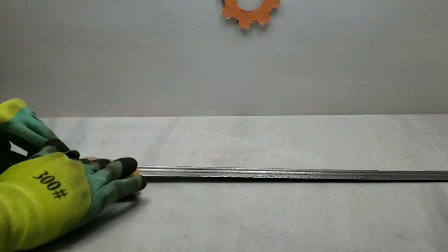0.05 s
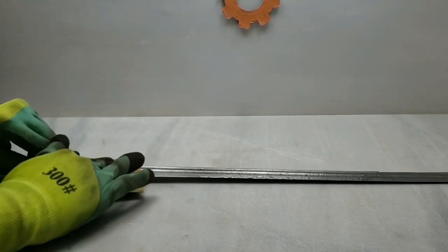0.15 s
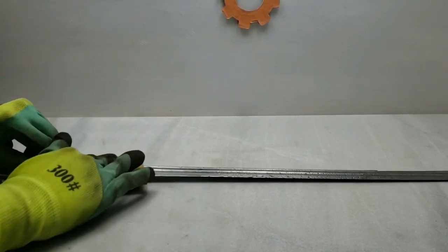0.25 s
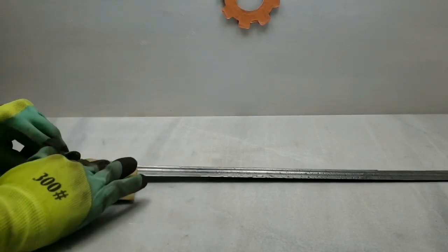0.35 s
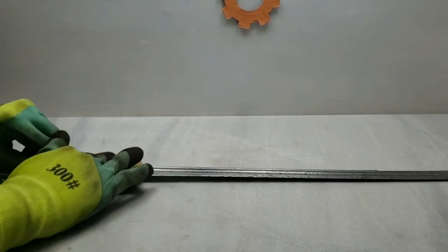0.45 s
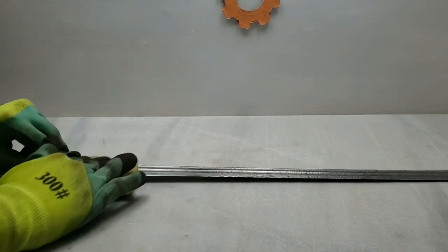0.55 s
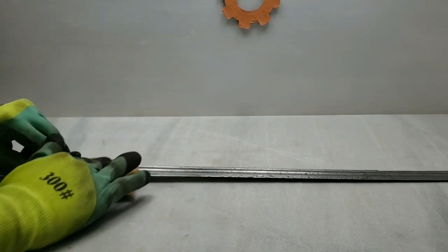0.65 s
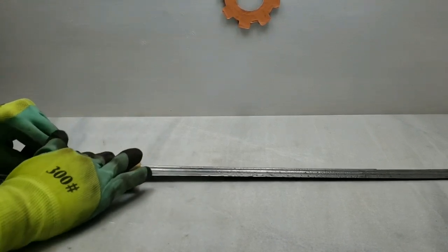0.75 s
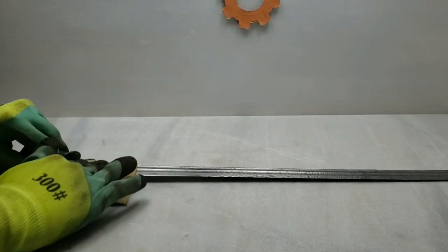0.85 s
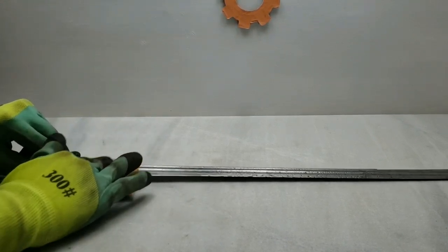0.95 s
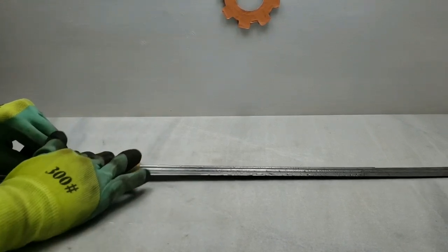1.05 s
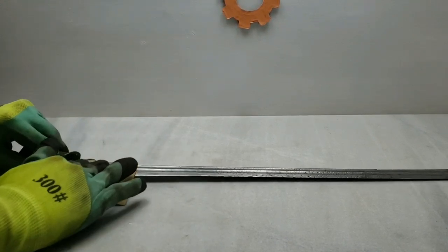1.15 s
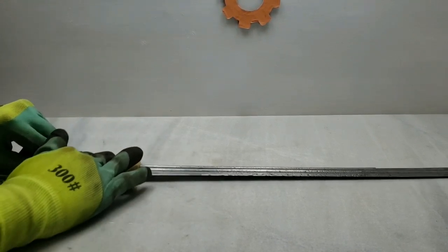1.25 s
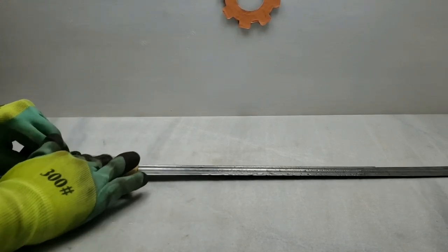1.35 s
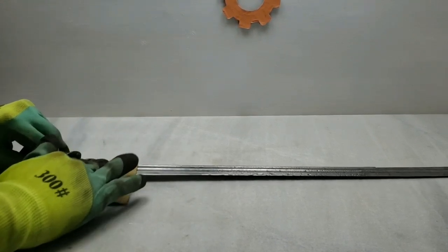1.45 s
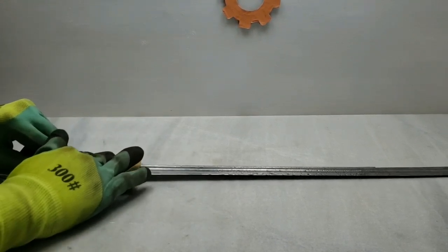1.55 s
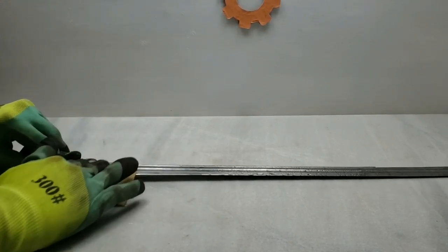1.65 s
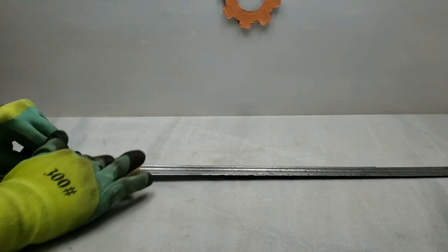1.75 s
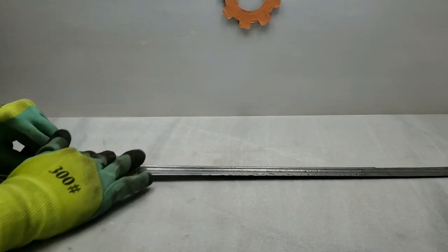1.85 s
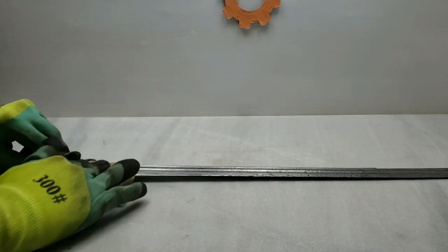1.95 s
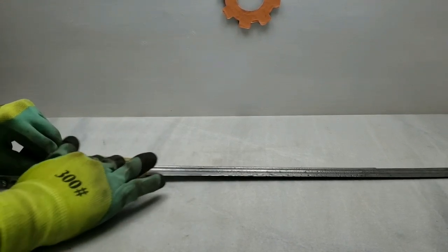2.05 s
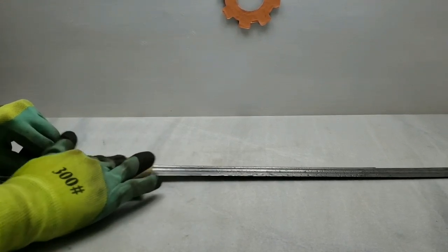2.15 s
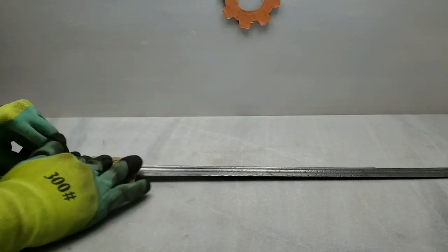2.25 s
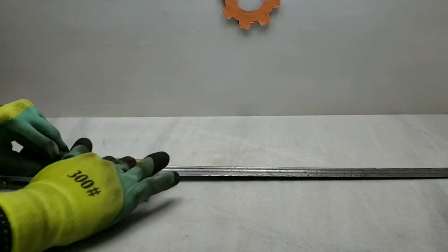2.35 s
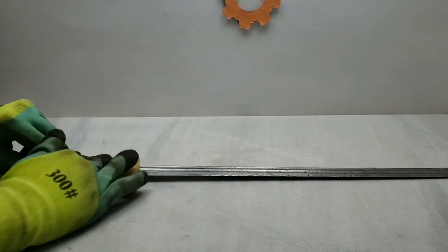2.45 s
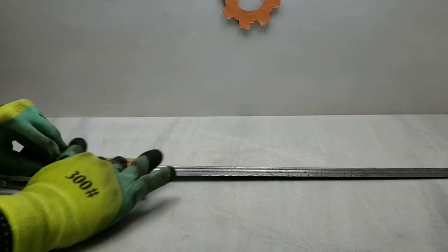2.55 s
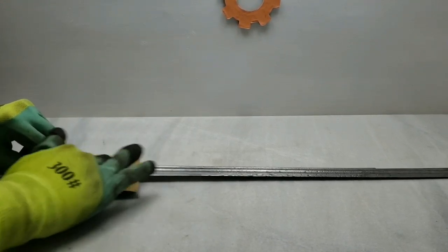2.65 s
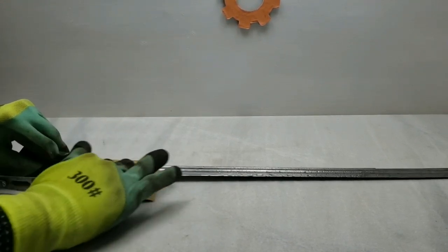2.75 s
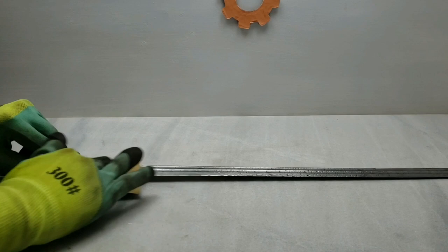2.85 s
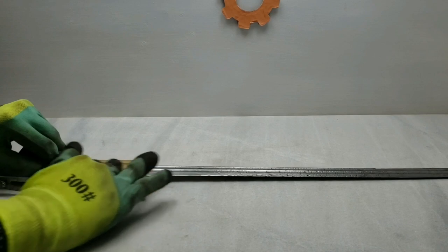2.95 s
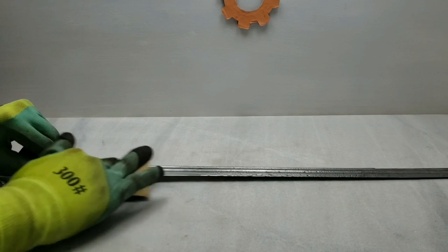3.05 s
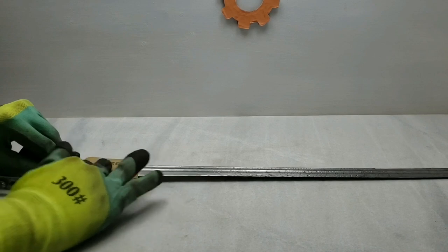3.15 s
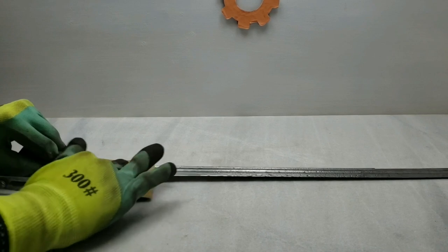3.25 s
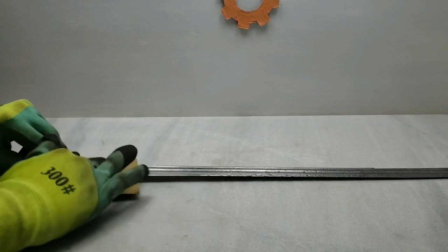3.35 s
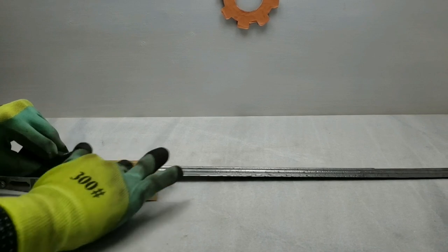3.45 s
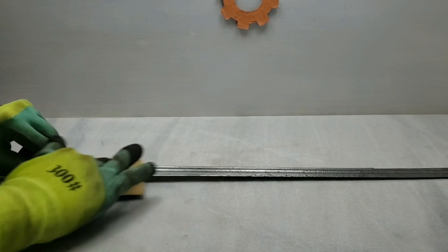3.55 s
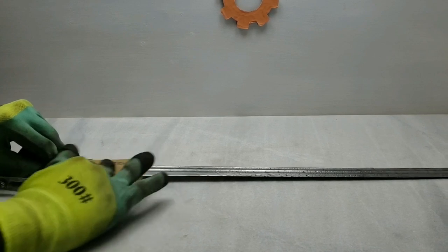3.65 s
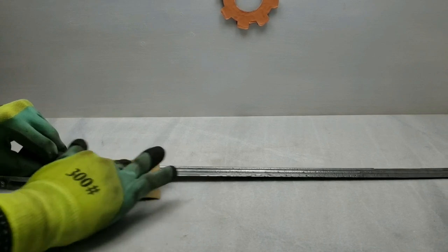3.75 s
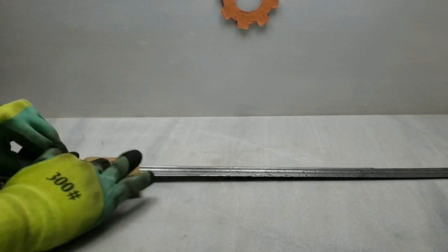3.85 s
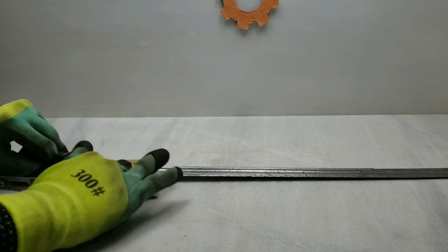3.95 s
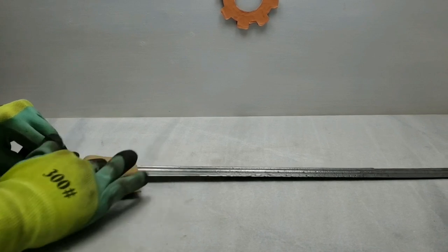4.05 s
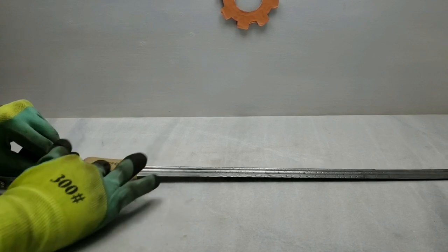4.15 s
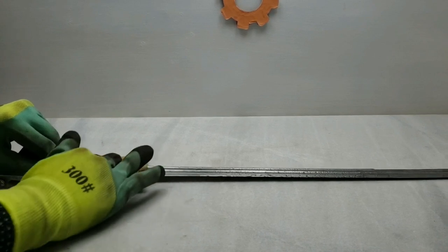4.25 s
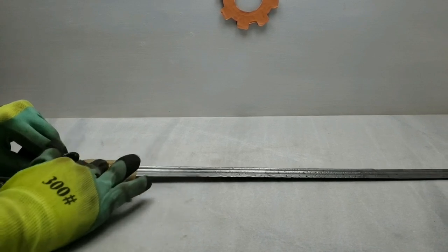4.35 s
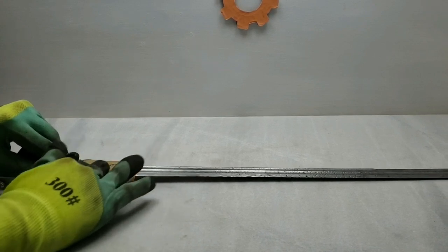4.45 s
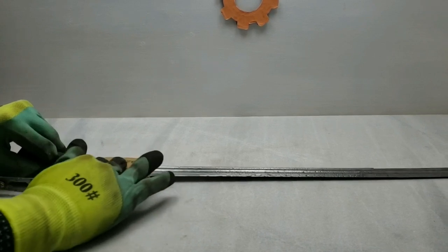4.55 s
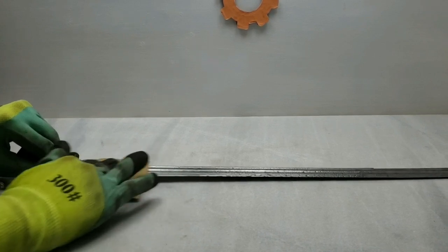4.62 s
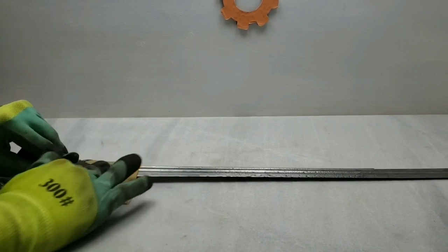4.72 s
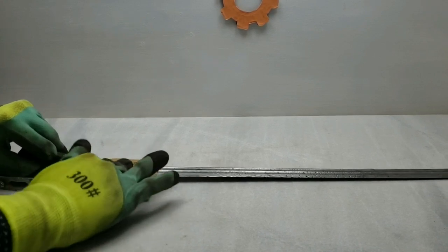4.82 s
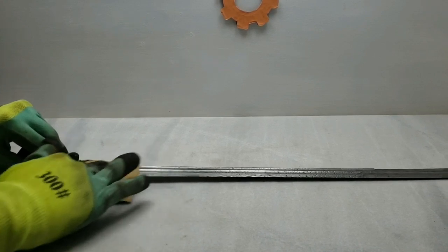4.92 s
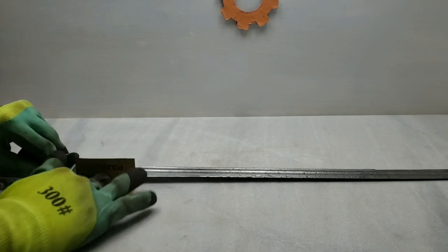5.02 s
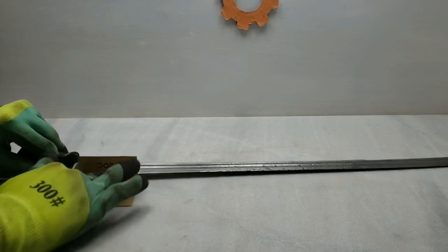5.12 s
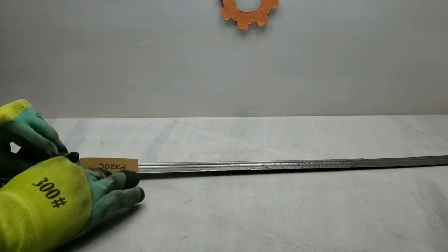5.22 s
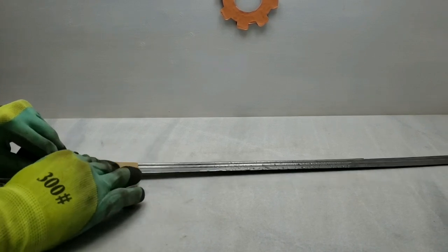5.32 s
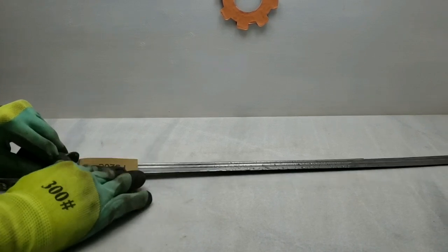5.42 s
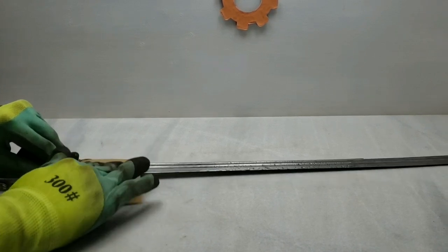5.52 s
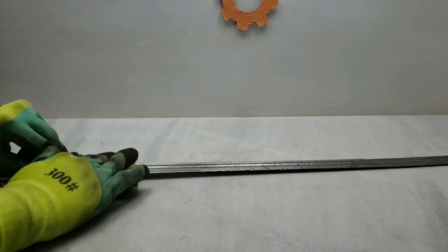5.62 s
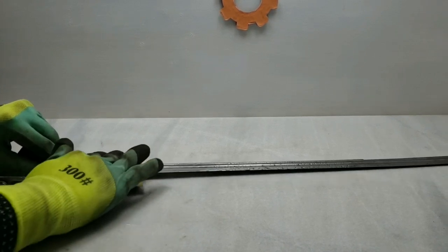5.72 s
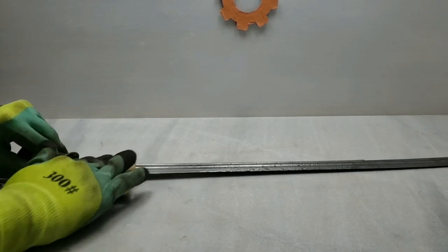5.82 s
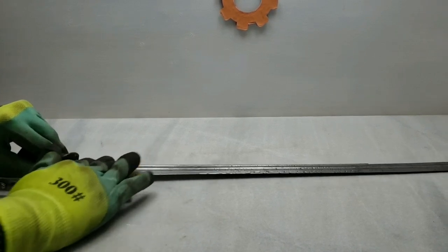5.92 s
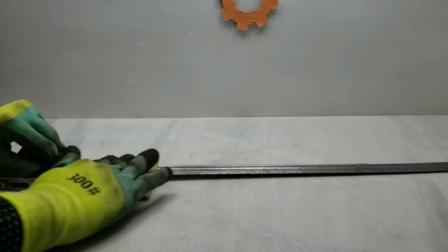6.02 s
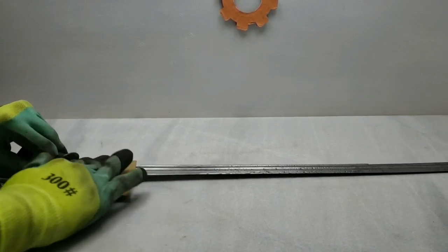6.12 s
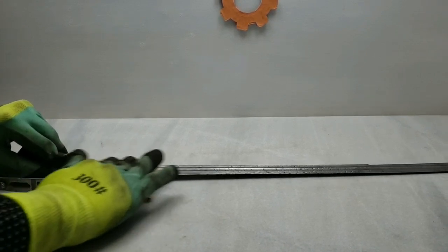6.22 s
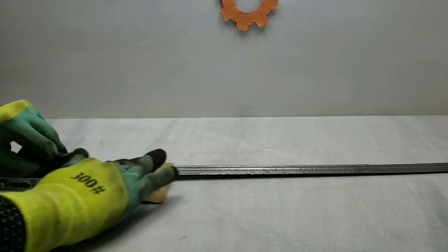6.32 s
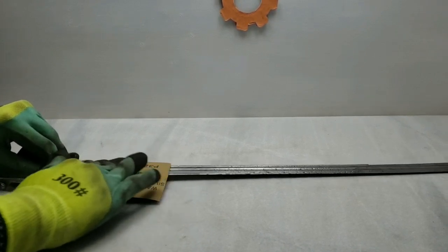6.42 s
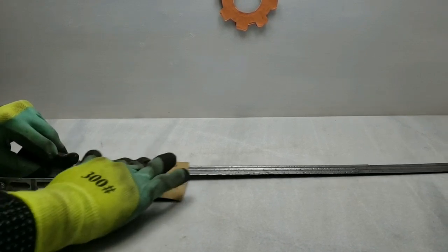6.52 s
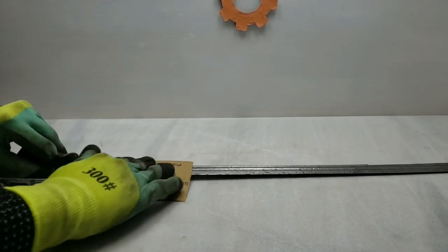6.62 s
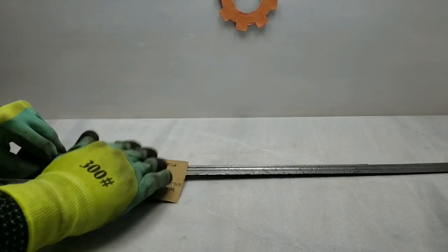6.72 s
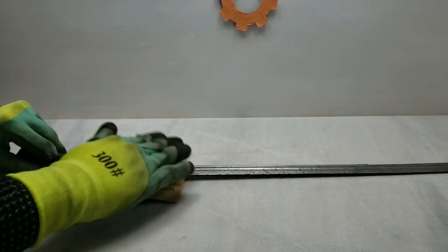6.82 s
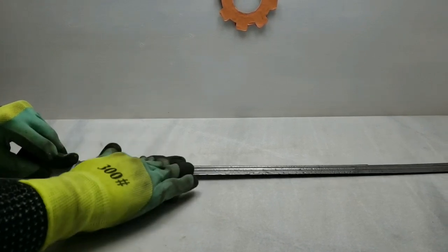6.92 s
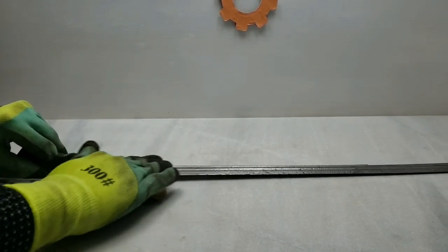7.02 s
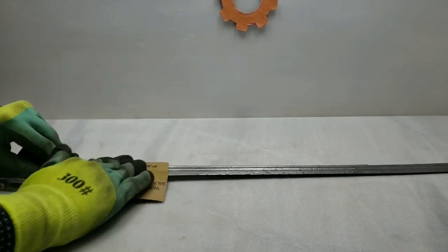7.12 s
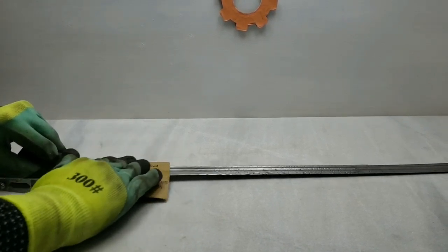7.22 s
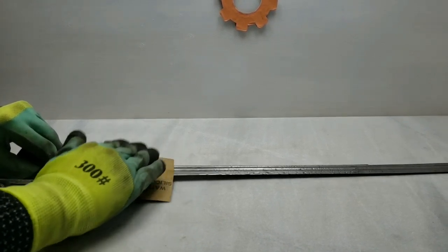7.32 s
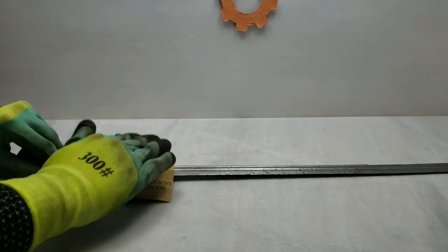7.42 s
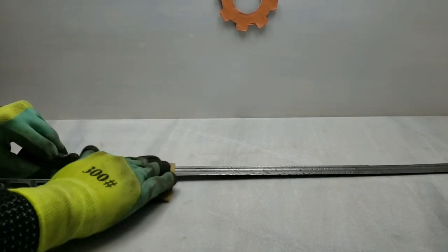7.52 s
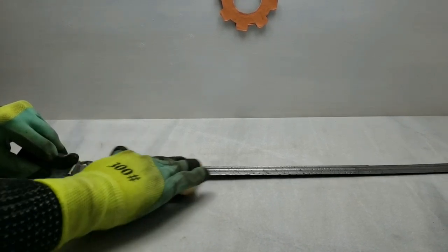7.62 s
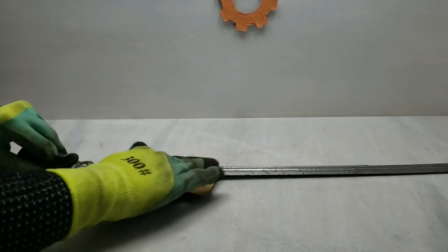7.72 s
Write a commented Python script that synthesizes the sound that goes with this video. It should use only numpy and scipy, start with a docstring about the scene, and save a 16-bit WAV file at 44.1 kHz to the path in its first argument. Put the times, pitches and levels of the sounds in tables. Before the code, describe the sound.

Wet sandpaper rubs quickly back and forth on a steel blade, gritty hissing strokes, with one loud metallic clatter on the bench partway through.

```python
"""Gritty hiss strokes come first: wet sandpaper rubbed to and fro along a steel blade lying on a bench.
Each stroke is grain noise shaped by the paper's speed; its load drums and rasps the bench through the blade.
The blade knocks and skids as ringing modes plus scuffing noise, with one loud clatter near 5 s; the frame sways low.
A small hard room of decaying noise echoes fills the pauses over quiet air, picked up close by a two-port microphone."""
import sys
import numpy as np
from scipy import signal
from scipy.fft import rfft, irfft, next_fast_len
from scipy.io import wavfile
from scipy.ndimage import uniform_filter1d

SR = 44100
rng = np.random.default_rng(int(sys.argv[2]) if len(sys.argv) > 2 else 0)


def transcribe(signal):
    """Save signal, clipped to [-1, 1], as a 16-bit WAV file at the path in sys.argv[1]."""
    frames = np.atleast_2d(signal).T
    limited = np.clip(frames, -1, 1)
    pcm = np.round(limited * 32767).astype(np.int16)
    wavfile.write(sys.argv[1], SR, pcm)


N = 342657  # length in samples

# Quiet room air, relative spectrum: [f/Hz, level/dB]
AIR_COLOUR = [(18, -23.5), (30, 4), (118, -6), (239, -19), (822, -11), (1220, -23), (2170, -11),
              (2680, -27), (5170, -20.5), (8740, -42.5), (14400, -22), (16000, -37)]
AIR_DB = -71.5  # rms fed to the ports

# Decay of the room: [f/Hz, t60/s]
ROOM_DECAY = [(100, 0.41), (500, 0.15), (2000, 0.31), (5000, 0.29), (10000, 0.34), (16000, 0.35)]
# Room against direct sound: [f/Hz, level/dB]
ROOM_LEVEL = [(100, -34.5), (400, -7), (1500, -1), (5000, -6.5), (12000, -10)]

# Phase by which the left port leads: [f/Hz, lead/rad]
PORT_LEAD = [(0, -2), (600, 1.06), (860, -2), (1380, 3), (2070, 1.34), (3450, 2.5), (5250, 5.5),
             (7670, 4.5), (9040, 11.5), (9990, 8.5), (12100, 4.5), (13000, 0.5), (14600, -3.5),
             (16600, -20)]
# Left minus right: [f/Hz, level/dB]
PORT_TILT = [(60, -4), (180, 2), (550, -0.5), (1650, 4.5), (4970, -1.5), (15000, 0)]
# Left-right likeness, as a share of power: [f/Hz, share/0..1]
PORT_LIKENESS = [(100, 0.77), (300, 0.79), (1000, 0.54), (3000, 0.74), (8000, 0.39), (15000, 0.12)]
EDGE_HZ = 15950

# Low noise of the swaying frame, relative spectrum: [f/Hz, level/dB per Hz]
SWAY_COLOUR = [(12, -49), (20, -21), (42, 3.5), (59, 0), (93, 1.5), (135, -16), (167, -10), (200, 1.5),
               (260, -8), (440, -120)]
# Pushes on the frame: [t/s, level/dB]
PUSHES = [(0.296, -52), (1.046, -53), (1.349, -50), (1.479, -57), (1.841, -46), (1.952, -50), (2.206, -58),
          (2.568, -53), (2.929, -54), (3.102, -47), (3.191, -52), (3.725, -53), (4.072, -52), (4.152, -58),
          (4.281, -50), (4.703, -50.5), (5.04, -50), (5.901, -56), (6.039, -57), (6.425, -59),
          (6.963, -45.5), (7.029, -56), (7.563, -47.5), (7.64, -49)]
PUSH_RISE_S, PUSH_FADE_S = 0.017, 0.036
# Resting pitch, the extra pitch at the start, and the time the extra takes to sag
PUSH_HZ, PUSH_SAG_HZ, PUSH_SAG_S = 56.3, 35.2, 0.031

# Drumming bench top, relative spectrum before the blade: [f/Hz, level/dB per Hz]
DRUM_COLOUR = [(76, -50), (130, -11), (336, -11.5), (442, -3.5), (484, -6), (582, -1.5), (652, -5.5),
               (1240, -0.5), (1370, -11), (2000, -7.5), (2600, -26.5), (4400, -120)]
# Trim of the lowest part of the top: [t/s, level/dB]
BOOM_TRIM = [(0, 2.5), (2.1, 2), (2.5, -0.5), (4.2, -1), (5.1, 1.5), (6.3, 1), (6.6, -3.5), (7.77, 1)]
BOOM_HZ, BOOM_RISE_S, BOOM_FADE_S = 380, 0.062, 0.044  # the lowest part answers late
RUMBLE_RISE_S, RUMBLE_FADE_S, DRUM_LAG_S = 0.0075, 0.054, 0.042

# Modes of the blade on the bench: [f/Hz, relative level/dB, t60/s]
BLADE_MODES = [(179.5, -18, 0.34), (293.2, -6.5, 0.4), (455.4, -3.5, 0.16), (577, 3.5, 0.16),
               (825, 6.5, 0.053), (1054, 0, 0.068), (1288, 5.5, 0.048), (1544, 12.5, 0.028),
               (1602, 2.5, 0.058), (2046, 13, 0.018), (1895, 2, 0.11), (1920, -6, 0.14), (2200, -5, .09),
               (2460, -9.5, 0.31), (2730, -15, .15), (2860, -2, .1), (2846, -5.5, 0.041), (3158, -9.5, .1)]
# The blade knocks or skids on the bench:
# [t/s, peak level/dB, region f/Hz, region half-width at -6 dB/octaves, rumble of the top before trims/dB]
KNOCKS = [(.079, -31, 821, 3.5, -54), (.177, -40, 580, 0.31, -60), (.4, -36, 581, 4.5, -64),
          (.638, -31.5, 563, 2.3, -59), (.888, -27.5, 1830, 0.57, -51), (1.039, -31, 1020, 2.2, -55.5),
          (1.129, -34, 581, 1.4, -50), (1.314, -25.5, 1840, 2.7, -50), (1.352, -31, 1020, 0.42, -57),
          (1.699, -34.5, 570, 1, -67), (1.956, -24, 1580, 1.3, -55), (2.309, -41, 595, 1.8, -71),
          (2.538, -27.5, 605, 2.2, -54), (2.741, -26.5, 614, 1.8, -53), (2.962, -33.5, 580, 1.8, -55.5),
          (3.183, -28.5, 1500, 1.9, -50.5), (3.428, -40, 624, 0.62, -57), (3.667, -29.5, 1860, 2.7, -53),
          (3.909, -39, 594, 1.4, -56.5), (4.14, -27.5, 1890, 2.6, -50), (4.521, -40, 734, 1.4, -72),
          (4.652, -36, 463, 2.5, -54), (5.019, -30.5, 1910, 3.4, -73.5), (5.026, -9, 2040, 1.2, -59),
          (5.054, -18.5, 2100, 0.31, -57), (5.131, -30.5, 2270, 1.7, -47), (5.183, -25, 2030, 1.8, -71),
          (5.247, -54, 2220, 1.9, -68), (5.46, -40, 2260, 0.31, -82), (5.495, -48, 2380, 1.4, -73),
          (5.554, -28, 2250, 0.84, -63), (5.741, -30, 2250, 1, -71), (5.803, -43.5, 526, 0.58, -64),
          (5.86, -54, 530, 1.7, -54.5), (5.89, -38, 900, 1.8, -58), (6.047, -35, 1640, 0.81, -81),
          (6.194, -38.5, 595, 2.2, -53), (6.785, -46, 2020, 0.73, -105), (6.957, -44, 1070, .75, -49),
          (7.607, -44, 593, 1.1, -50)]
CONTACT_S = 0.0039
RING_DB, RING_HZ = 3, 700  # modes under RING_HZ also ring, RING_DB above the tabled rumble

# How the grip shifts: [t/s, fine hiss level/dB, blade scrape level/dB,
# rasp against drumming level/dB, sway of the frame level/dB]
GRIP = [(0, -4, -7, 0, -60), (.7, -2.5, -1, 0.5, -63.5), (1.4, -4, -4, 3.5, -59.5),
        (2, -2, -3.5, -3.5, -58), (2.3, -7.5, -9, 4.5, -60.5), (2.7, -3.5, -7.5, 2.5, -61),
        (3.1, -4.5, -10.5, -0.5, -65), (3.5, -4.5, -5.5, 3, -65.5), (4.3, -4, -4.5, 2, -62),
        (4.95, -5, -3.5, -0.5, -62), (5.02, -8, -5.5, -26, -67), (5.07, 0, 2.5, 11, -66),
        (5.3, -2.5, 3.5, 6.5, -73), (5.44, -1, 6, -6, -72.5), (5.56, -5.5, -7, 17, -72.5),
        (5.85, -3.5, -3.5, 0, -75), (6.2, -5.5, -4, 3, -69), (6.5, -5.5, -11.5, 5.5, -70.5),
        (6.96, -8.5, 2, -1, -79), (7.07, 0.5, -5.5, 7, -70), (7.3, -6.5, -4, 11, -85),
        (7.57, -11.5, -7, 9, -64), (7.66, -2, -10, 15.5, -58.5)]
# Strokes, before grip and layer trims: [t/s, time to top speed/s, slow-down/s, level/dB,
# first bite against the top level/dB, load on the bench level/dB]; motion() lengthens both times slightly
STROKES = [(0, 0.0028, 0.019, -43.5, -5, -55), (0.011, 0.025, 0.023, -32.5, -8, -51),
           (0.064, 0.006, 0.16, -44, 9, -55), (0.221, 0.042, 0.081, -39.0, -6.5, -46),
           (0.343, 0.054, 0.052, -39.0, -8, -45.5), (0.468, 0.056, 0.061, -40.5, -3.5, -54),
           (0.596, 0.059, 0.053, -40.5, -5, -50), (0.719, 0.046, 0.069, -39, -9, -51),
           (0.846, 0.068, 0.053, -40.5, -8.5, -53.5), (0.984, 0.038, 0.078, -39, -2.5, -49.5),
           (1.105, 0.066, 0.048, -39.5, -9.5, -60), (1.238, 0.054, 0.081, -41.0, -2.5, -53.5),
           (1.363, 0.082, 0.04, -39, -7.5, -52), (1.512, 0.06, 0.069, -42, -4.5, -54),
           (1.64, 0.063, 0.04, -38.5, -10.5, -48.5), (1.764, 0.074, 0.044, -37.5, -8.5, -47.5),
           (1.897, 0.076, 0.036, -38.5, -5.5, -48), (2.027, 0.083, 0.054, -36.0, -18, -50.5),
           (2.201, 0.04, 0.023, -34, -10.5, -53.5), (2.346, 0.033, 0.048, -30.5, -8, -50.5),
           (2.459, 0.013, 0.056, -33, 0, -52.5), (2.566, 0.052, 0.036, -33.5, -23, -49),
           (2.683, 0.02, 0.038, -34.0, -2, -50.5), (2.782, 0.048, 0.041, -32, -22, -56),
           (2.909, 0.036, 0.021, -32, -6.5, -60), (3.011, 0.041, 0.043, -34, -20, -51),
           (3.134, 0.02, 0.039, -34.5, 2.5, -53), (3.249, 0.042, 0.047, -36, -6, -60.5),
           (3.374, 0.026, 0.038, -34.5, -8, -60), (3.482, 0.054, 0.046, -34.5, -21.5, -52.5),
           (3.611, 0.033, 0.042, -35.5, -5, -56), (3.737, 0.033, 0.049, -33, -7, -51.5),
           (3.861, 0.021, 0.057, -35, -3, -67), (3.966, 0.047, 0.045, -36, -18, -55.5),
           (4.095, 0.0047, 0.084, -35.0, -5.5, -70), (4.236, 0.054, 0.065, -36.5, -9, -52),
           (4.365, 0.057, 0.054, -36.5, -5.5, -47.5), (4.507, 0.067, 0.049, -36.5, -16, -49),
           (4.645, 0.049, 0.033, -37.0, -5.5, -55), (4.786, 0.046, 0.059, -35, -19, -50.5),
           (4.926, 0.019, 0.093, -34.0, -2, -46.5), (5.008, 0.027, 0.015, -24.5, -13.5, -40.5),
           (5.05, 0.0024, 0.019, -25, 3.5, -46), (5.12, 0.0096, 0.091, -40.5, -4, -56),
           (5.231, 0.019, 0.078, -48, -2, -68), (5.449, 0.032, 0.035, -56, -17, -75),
           (5.496, 0.0013, 0.023, -49.5, -2, -62), (5.55, 0.0053, 0.077, -34, -10, -65),
           (5.615, 0.031, 0.043, -40, -11, -69), (5.687, 0.05, 0.059, -44, 2, -65),
           (5.786, 0.067, 0.065, -38.5, -20.5, -51), (5.943, 0.1, 0.031, -34.0, -28, -57),
           (6.107, 0.056, 0.037, -36.5, -8, -82), (6.258, 0.068, 0.046, -33, -7, -59),
           (6.408, 0.0076, 0.027, -36.5, -1.5, -58), (6.44, 0.0067, 0.052, -51, -4, -63),
           (6.549, 0.048, 0.065, -34.5, -6.5, -59), (6.689, 0.075, 0.04, -46.5, -11, -61.5),
           (6.954, 0.0059, 0.045, -41.5, -4, -48.5), (7.0, 0.1, 0.017, -36.5, -10, -60),
           (7.125, 0.0067, 0.094, -50.5, -3, -77), (7.29, 0.031, 0.081, -46, -8, -75),
           (7.56, 0.01, 0.044, -37.5, -1, -53), (7.6, 0.085, 0.15, -34.0, -10, -96)]
BITE_S, SLOWING_POWER = 0.014, 1.23  # longest time for the paper to catch; curve of the slow-down
BITE_FINE, BITE_SCRAPE = 0.076, 0.033  # dB of fine hiss and of scrape gained per dB of first bite
# Colour of the rubbing, relative: [f/Hz, level/dB per Hz]
GRIT_COLOUR = [(350, -34), (940, -15.5), (1600, -9.5), (1740, -4), (1920, -5), (2770, 1.5), (3020, -2.5),
               (3260, 1), (3920, -0.5), (5390, -1.5), (7620, -4.5), (8800, -13.5), (14700, -12.5),
               (16000, -17)]


def gain_of(db):
    """Amplitude factor of a level in dB."""
    return 10 ** (np.asarray(db) / 20)


def evened(x):
    """Scales to an rms of one."""
    return x / np.sqrt(np.mean(x ** 2) + 1e-20)


def read(points, hz):
    """Reads a spectrum table along a logarithmic pitch axis."""
    f, value = np.transpose(points)
    return np.interp(np.log(hz + 1), np.log(f + 1), value)


def add(mix, s, sound):
    """Lays a sound into the mix at s seconds, cut at the end of the mix."""
    part = mix[round(s * SR):][:len(sound)]
    part += sound[:len(part)]


def filtered(x, response):
    """Applies response(Hz) to the whole sound."""
    size = next_fast_len(x.shape[-1] + 4096)
    spectrum = rfft(x, size) * response(np.fft.rfftfreq(size, 1 / SR))
    return irfft(spectrum, size)[..., :x.shape[-1]]


def patchy(x, bins, frames, depth_db):
    """Lifts and lowers random patches of pitch and time, the same ones in every channel."""
    z = signal.stft(x, nperseg=256, noverlap=192)[2]
    patches = rng.standard_normal(z.shape[1:])
    patches = uniform_filter1d(patches, bins, 0)
    patches = uniform_filter1d(patches, frames, 1)
    z = z * gain_of(depth_db * evened(patches))
    return signal.istft(z, nperseg=256, noverlap=192)[1][:, :N]


def swell_shape(rise_s, fade_s):
    """A half-second swell that rises and dies away, with a peak of one."""
    t = np.arange(SR // 2) / SR
    shape = (1 - np.exp(-t / rise_s)) * np.exp(-t / fade_s)
    return shape / shape.max()


def knock_swells(rise_s, fade_s):
    """The level of the bench top swells and dies away at each knock."""
    out = np.zeros(N)
    shape = swell_shape(rise_s, fade_s)
    for s, *_, rumble_db in KNOCKS:
        add(out, s, gain_of(rumble_db) * shape)
    return out


def grip(column):
    """Gain of one grip column through time, counted after the time column."""
    s, *levels = np.transpose(GRIP)
    return gain_of(np.interp(np.arange(N) / SR, s, levels[column]))


def air():
    """Quiet room air: steady coloured noise, one shared part and one for each port."""
    noise = rng.standard_normal((3, N))
    return gain_of(AIR_DB) * evened(filtered(noise, lambda hz: gain_of(read(AIR_COLOUR, hz))))


def room(x):
    """Dense echoes, each band dying at its own speed; four sets of random paths crossfade to vary the colour."""
    t = np.arange(N) / SR
    tail = np.arange(SR // 2)
    paths = rng.standard_normal((4, 2, SR // 2)) * (tail > 120)  # a short gap before the first echo
    hz, s, z = signal.stft(paths, SR, nperseg=256)
    t60 = read(ROOM_DECAY, hz)[:, None]
    level_db = read(ROOM_LEVEL, hz)[:, None] - 60 * s / t60
    z *= gain_of(level_db) / np.sqrt(SR * t60 / np.log(1e6))  # equal energy whatever the decay
    tails = signal.istft(z, SR, nperseg=256)[1]
    # a steady crossfade, 11.3 steps a second
    turn = np.maximum(np.cos(np.pi / 2 * (11.3 * t - np.arange(4)[:, None])), 0)
    return signal.oaconvolve((x * turn)[:, None], tails, axes=2).sum(0)[:, :N]


def ports(x):
    """One part reaches both ports, shifted in phase and level; the spread-out contact gives each its own part."""
    shared = filtered(x[0], lambda hz: np.sqrt(read(PORT_LIKENESS, hz)))
    own = filtered(x[1:], lambda hz: np.sqrt(1 - read(PORT_LIKENESS, hz)))
    left, right = shared + own
    # each port takes half of the phase and level difference
    half = lambda hz: np.exp(.5j * read(PORT_LEAD, hz)) * gain_of(read(PORT_TILT, hz) / 2)
    return np.array([filtered(left, half), filtered(right, lambda hz: 1 / half(hz))])


def pushes():
    """A push swings the frame; the pitch sags to its rest as the swing dies."""
    out, t = np.zeros(N), np.arange(SR // 2) / SR
    shape = swell_shape(PUSH_RISE_S, PUSH_FADE_S)
    turns = np.cumsum(PUSH_HZ + PUSH_SAG_HZ * np.exp(-t / PUSH_SAG_S)) / SR
    for (s, db), phase in zip(PUSHES, rng.random(len(PUSHES))):
        add(out, s, gain_of(db) * shape * np.sin(2 * np.pi * (turns + phase)))
    return out


def frame():
    """The frame sways as low noise, peaked near 57 Hz and following the grip, and swings at each push."""
    peak = lambda hz: 1 + 0.54 / (1 + ((hz - 57) / 9) ** 2)
    sway = filtered(rng.standard_normal(N), lambda hz: gain_of(read(SWAY_COLOUR, hz)) * peak(hz))
    return evened(sway) * grip(column=3) + pushes()


def blade(hz):
    """Response of the blade's modes to a steady drive; a longer decay makes a narrower resonance."""
    return abs(sum(gain_of(db) / (1 + 2j * (hz - f) * t60 / 2.2) for f, db, t60 in BLADE_MODES))


def bench(load):
    """Rubbing and knocks drum through the blade's modes into the top; slow random patches vary which modes sound."""
    drive = patchy(rng.standard_normal((3, N)), 2, 50, depth_db=1.5)
    body = filtered(drive, lambda hz: gain_of(read(DRUM_COLOUR, hz)) * (1.3 + blade(hz)))
    drum = filtered(body, lambda hz: 1 / (1 + (hz / 750) ** 6))
    rasp = evened(body - drum)
    drum = evened(drum)
    boom = filtered(drum, lambda hz: 1 / (1 + (hz / BOOM_HZ) ** 8))
    # the drumming lags behind the load
    keep = np.exp(-1 / (SR * DRUM_LAG_S))
    lagged = signal.lfilter([1 - keep], [1, -keep], load)
    rumble = knock_swells(RUMBLE_RISE_S, RUMBLE_FADE_S)
    late = knock_swells(BOOM_RISE_S, BOOM_FADE_S)
    boom_trim = gain_of(np.interp(np.arange(N) / SR, *np.transpose(BOOM_TRIM)))
    top = boom * boom_trim * (0.89 * lagged + 1.17 * late)
    top += (drum - boom) * (lagged + 0.78 * rumble)
    # the rasp follows the load at once
    top += rasp * grip(column=2) * (0.88 * load + 0.45 * rumble)
    return top


def scuff(region):
    """Noise of a skid: it starts bright and sinks in pitch as the slide slows."""
    u = np.arange(SR // 4) / SR / CONTACT_S
    rough = rng.standard_normal(len(u))
    bright = filtered(rough, lambda f: region(f / 1.6)) * np.minimum(4 * u, 1) * np.exp(-.6 * u)
    dull = filtered(rough, lambda f: region(f * 0.85)) * 0.34 * u * np.exp(-.3 * u)
    return bright + dull


def knocks():
    """A contact rings the modes of its pitch region, the high ones first, and scuffs in the same region."""
    out, t = np.zeros(N), np.arange(SR // 4) / SR
    hz, mode_db, t60 = np.transpose(BLADE_MODES)[:, :, None]
    rise = 1 - np.exp(-t * hz / (CONTACT_S * 900))  # CONTACT_S is the rise time at 900 Hz
    for s, db, region_hz, octaves, rumble_db in KNOCKS:
        region = lambda f: gain_of(-6 * (np.log2((f + 1) / region_hz) / octaves) ** 2)
        phase = rng.random((len(BLADE_MODES), 1))
        chance = rng.standard_normal((len(BLADE_MODES), 1))
        decay = gain_of(mode_db + 2.2 * chance - 60 * t / t60)
        ring = decay * rise * np.sin(2 * np.pi * (hz * t + phase))
        blow = evened((region(hz) * ring).sum(0)) + gain_of(-2.5) * evened(scuff(region))
        low = (ring * (hz < RING_HZ)).sum(0)
        add(out, s, gain_of(db) * blow / abs(blow).max())
        add(out, s, gain_of(rumble_db + RING_DB) * low / abs(low).max())
    return out


def motion():
    """Speed of the paper, scaled for blade scrape, main hiss and fine hiss, and the load it puts on the bench."""
    scrape, main, fine, load = np.zeros((4, N))
    for s, up, down, db, bite_db, load_db in STROKES:
        up, down = up + 0.00056, down + 0.0011  # no stroke starts or stops instantly
        t = np.arange(0, up + down, 1 / SR)
        catch = np.minimum(t / min(BITE_S, up), 1)
        swell = np.interp(t, [0, up], [gain_of(bite_db), 1]) * catch
        shape = swell * (1 - np.clip((t - up) / down, 0, 1) ** SLOWING_POWER)
        add(scrape, s, gain_of(db + BITE_SCRAPE * bite_db) * shape)
        add(main, s, gain_of(db) * shape)
        add(fine, s, gain_of(db + BITE_FINE * bite_db) * shape)
        add(load, s, gain_of(load_db) * shape)
    return np.array([scrape * grip(column=1), main, fine * grip(column=0)]), load


def grit(spread_db):
    """Grains of uneven size tear loose in three places; random patches of pitch and time make the hiss uneven."""
    size_db = spread_db * np.minimum(rng.exponential(1, (3, N)), 5)
    grains = rng.standard_normal((3, N)) * gain_of(size_db)
    return patchy(grains, 4, 24, depth_db=2.5)


def sanding(speed):
    """Blade scrape, main hiss and fine hiss follow the speed of each stroke."""
    rub = filtered(grit(spread_db=2.0), lambda hz: gain_of(read(GRIT_COLOUR, hz)))
    under = lambda hz, edge_hz: 1 / (1 + (hz / edge_hz) ** 10)
    scrape = filtered(rub, lambda hz: under(hz, 3170) * (7.2 + blade(hz)))
    main = filtered(rub, lambda hz: (1 - under(hz, 2940)) * under(hz, 8870))
    fine = filtered(rub, lambda hz: 1 - under(hz, 9250))
    hiss = speed[0] * evened(scrape) * gain_of(-1.5)
    hiss += speed[1] * evened(main) * gain_of(0.54)
    hiss += speed[2] * evened(fine) * gain_of(3.67)
    return hiss


def scene():
    """Close sounds and air reach the ports; the room echoes their shared part; the frame is equal in both."""
    speed, load = motion()
    near = bench(load) + sanding(speed)
    near[0] += knocks()  # the knocks are in the shared part only
    # the air is left out of the echoes
    return ports(near + air()) + room(near[0]) + frame()


def record(dry):
    """The band limit of the recorder: a steep low-pass at EDGE_HZ."""
    low_pass = signal.firwin(511, EDGE_HZ, window=("kaiser", 9), fs=SR)
    return signal.oaconvolve(dry, low_pass[None], "same")


dry = scene()
out = record(dry)
transcribe(out)
```